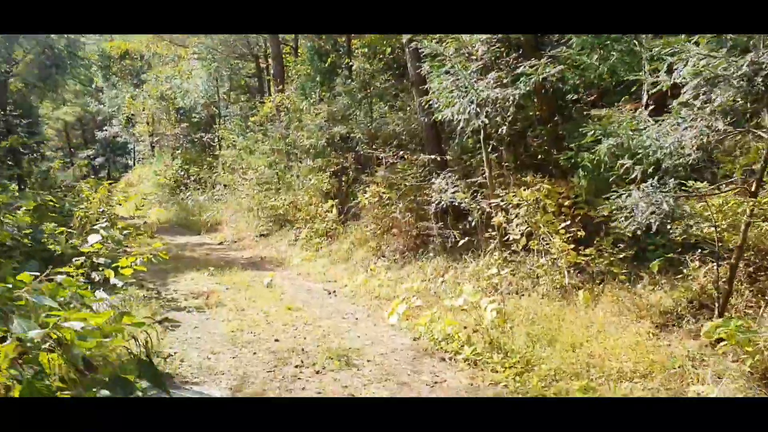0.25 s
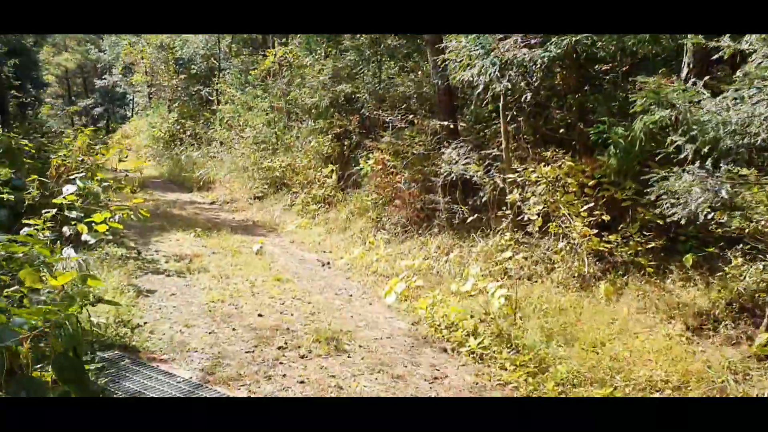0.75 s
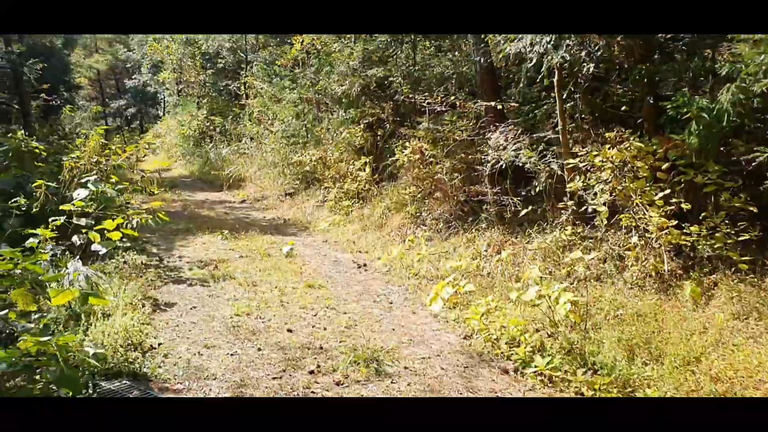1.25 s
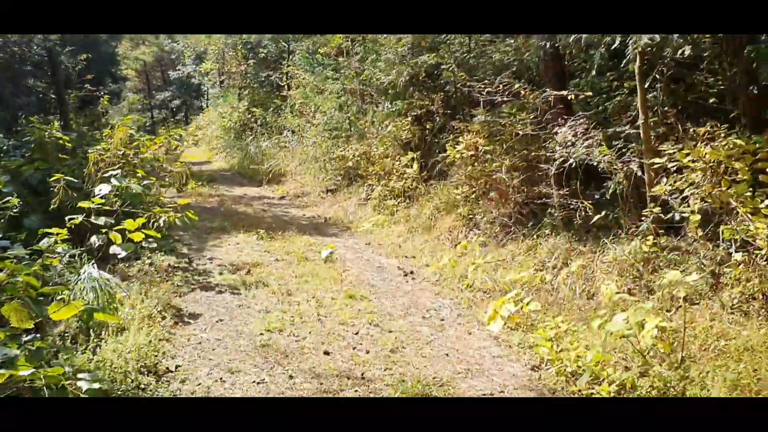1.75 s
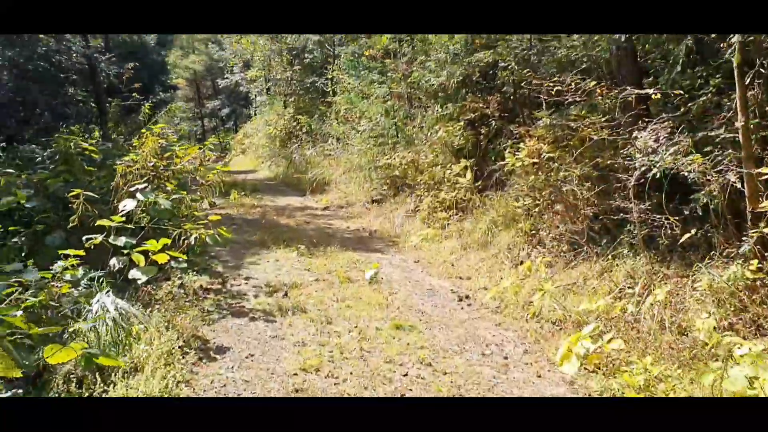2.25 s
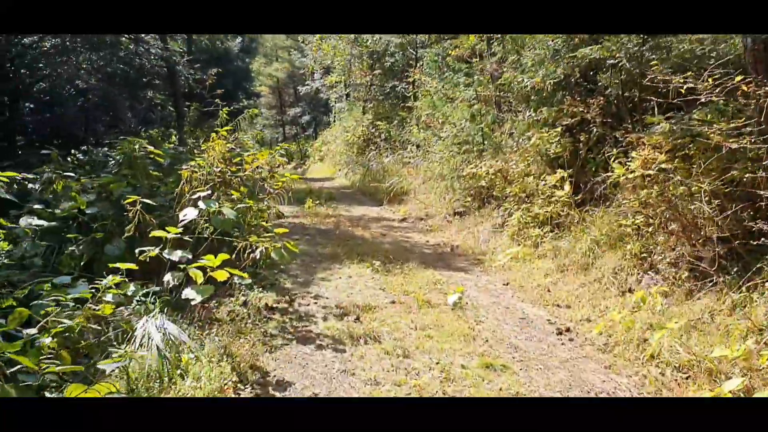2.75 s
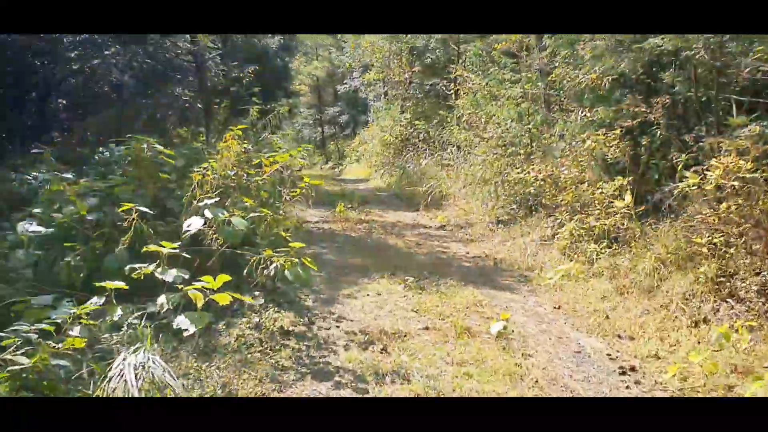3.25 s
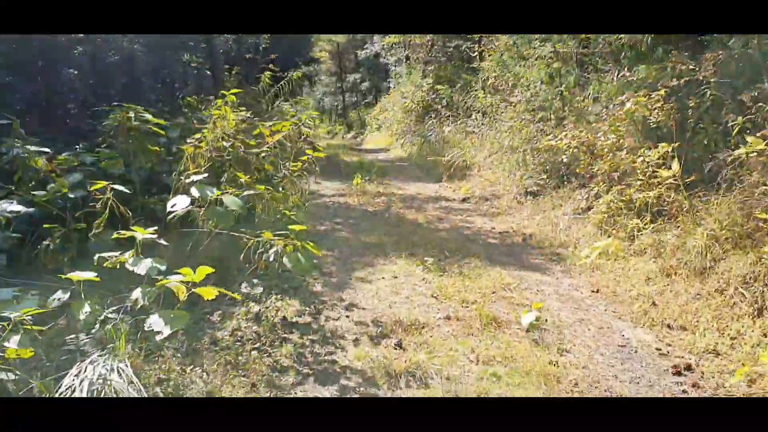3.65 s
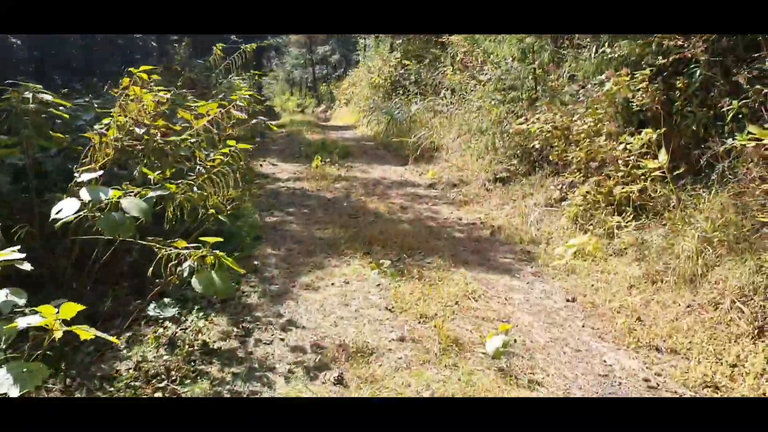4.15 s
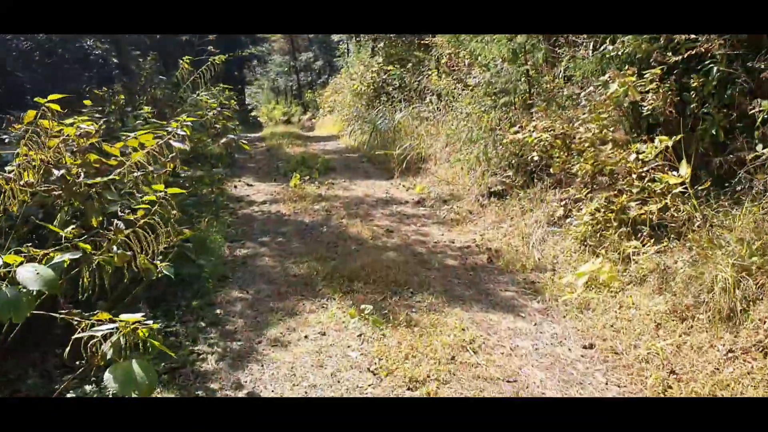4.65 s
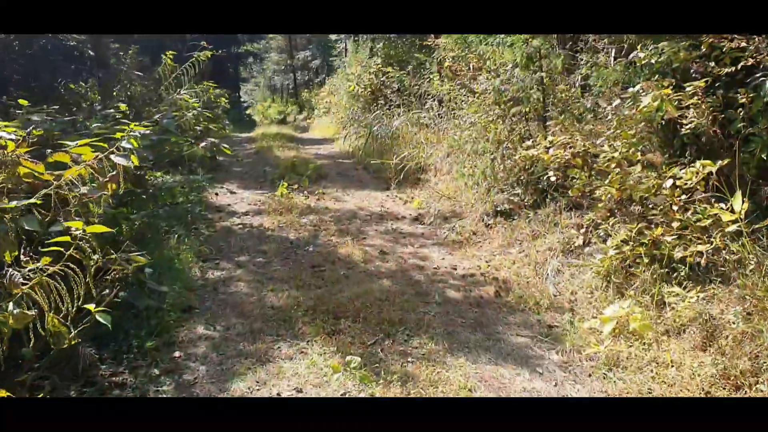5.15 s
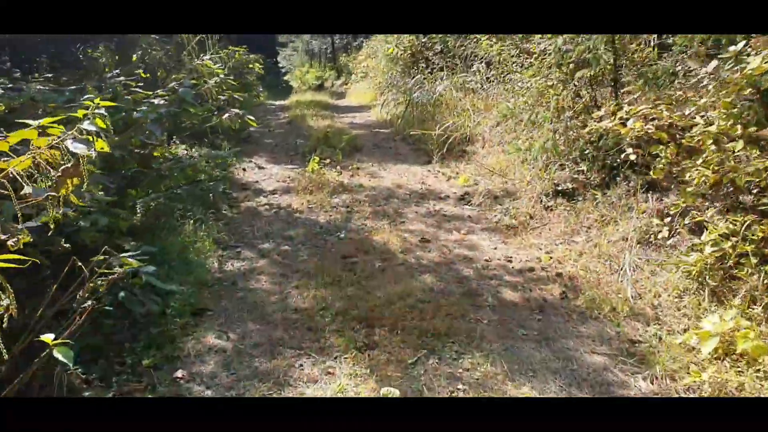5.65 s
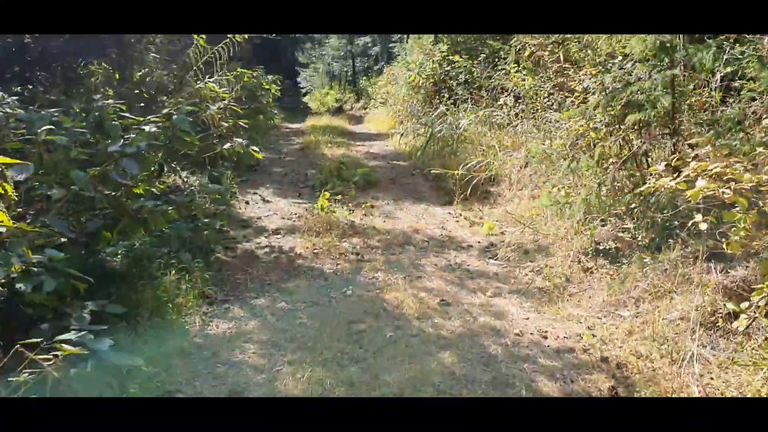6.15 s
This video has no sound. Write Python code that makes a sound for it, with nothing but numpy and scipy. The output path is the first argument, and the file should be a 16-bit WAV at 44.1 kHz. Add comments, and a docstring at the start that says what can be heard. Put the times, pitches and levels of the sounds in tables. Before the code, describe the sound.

A person walks steadily on dry, gritty ground with a hand-held stereo microphone. Crunching steps vary in weight, the third strongest with a knocking stone, and a hard pebble snap stands out midway. Between them come light scuffs, brushing grass, soft cloth rubs and scattered ticks. Deep muffled jolts thump near the beginning and again after the pebble snap. Only a short, thin forest reflection follows.

```python
"""Walk on a gravel trail

A person holding a camera walks a dirt and gravel forest trail, about two steps a second. Heel and sole press
earth, gravel, sand and dry grit: shaped noise and random grains. Single stones, twigs and clods knock, and
heels thump dully: short sine rings with a snap. Cloth, loose ground and grass rustle. The jolts of walking boom
in the camera body as low noise; the forest adds a short, thin tail."""
import sys
import numpy as np
from scipy import signal
from scipy.fft import rfft, irfft, next_fast_len
from scipy.io import wavfile
from scipy.ndimage import uniform_filter1d, map_coordinates

SR = 44100
rng = np.random.default_rng(int(sys.argv[2]) if len(sys.argv) > 2 else 0)


def master_out(mix):
    """Clip the mix to full scale and print it as 16-bit PCM to the path in sys.argv[1]."""
    frames = np.transpose(np.atleast_2d(mix))
    ceiling = np.clip(frames, -1, 1)
    pcm = np.round(ceiling * 32767).astype(np.int16)
    wavfile.write(sys.argv[1], SR, pcm)


N = 282681
TIME_S = np.arange(N) / SR


def amp(db):
    """Amplitude factor of a level in dB."""
    return 10 ** (np.asarray(db) / 20)


def unit(x):
    """x scaled to rms 1."""
    return x / np.sqrt(np.mean(x ** 2) + 1e-20)


def noise():
    """Two unrelated channels of white noise."""
    return rng.standard_normal((2, N))


def along(points, hz):
    """Values at hz, interpolated between (Hz, value) points on a log frequency axis."""
    point_hz, value = np.transpose(points)
    return np.interp(np.log(hz + 1), np.log(point_hz + 1), value)


def curves(rows):
    """One value per sample for each column after the time."""
    s, *columns = np.transpose(rows)
    return [np.interp(TIME_S, s, column) for column in columns]


def wobble(knots_per_s):
    """A smooth random curve."""
    knots = rng.standard_normal(int(N * knots_per_s / SR) + 4)
    return map_coordinates(knots, [np.arange(N) * knots_per_s / SR])


def hump(s, width_s):
    """A bell-shaped swell of height 1 around time s."""
    return np.exp(-np.minimum(((TIME_S - s) / width_s) ** 2, 50))


def filtered(x, response):
    """x times a response of frequency, padded against wrap-around."""
    m = next_fast_len(N + SR // 4)
    spectrum = rfft(x, m) * response(np.fft.rfftfreq(m, 1 / SR))
    return irfft(spectrum, m)[..., :N]


# Stereo width. Each row: frequency in Hz, side minus mid in dB.
SIDE_WIDTH = [(60, -4), (130, -11.5), (300, -12.5), (1000, -10.5), (2200, -5.5), (4400, -2.5), (7000, 0),
              (9000, 1), (15000, 0.5)]


def stereo(pair, spectrum):
    """Two unrelated signals become coloured mid and side, then left and right of joint rms 1."""
    def response(hz):
        side_gain = amp(along(SIDE_WIDTH, hz))
        return amp(along(spectrum, hz)) * np.array([np.ones_like(hz), side_gain])

    mid, side = filtered(pair, response)
    return unit(np.array([mid + side, mid - side]))


def grains(rate_hz, spread_db, octaves=6):
    """Random tiny impacts of uneven size, rate_hz in each octave from 17 kHz down; each rings in its octave."""
    out = np.zeros((2, N))
    for octave in range(octaves):
        top_hz = 17000 / 2 ** octave
        size_db = spread_db * np.minimum(rng.standard_normal(N), 1.6)
        hits = (rng.random(N) < rate_hz / SR) * amp(size_db)
        signed_hits = unit(hits * rng.choice([-1, 1], (2, N)))
        b, a = signal.butter(1, [top_hz / 2, top_hz], "bandpass", fs=SR)
        out += signal.lfilter(b, a, signed_hits)
    return unit(out)


# Rustle of walking. Each row: time in seconds, cloth in dB, loose ground in dB, grass in dB.
RUSTLE_LEVELS = [(0.0, -66, -70.5, -67.5), (0.5, -77.5, -79.5, -76), (0.89, -70, -68, -73),
                 (1.18, -65.5, -61.5, -66.5), (1.37, -67.5, -72.5, -77), (2.05, -75, -79.5, -78.5),
                 (2.27, -64, -70, -65), (2.82, -69, -72.5, -75.5), (3.18, -75, -80.5, -79),
                 (3.46, -66, -68, -74), (4.34, -72, -69.5, -69), (4.53, -68, -74.5, -71),
                 (4.86, -71, -62.5, -66.5), (5.0, -63.5, -73, -73), (5.21, -76.5, -75.5, -76.5),
                 (5.91, -67.5, -61.5, -66.5), (6.12, -68, -72.5, -74.5), (6.41, -77, -69.5, -70)]
# Swinging foot skims the ground. Each row: peak in seconds, half width in seconds,
# loose ground in dB, grass in dB.
FOOT_SKIMS = [(0.88, 0.045, -62.5, -69.5), (1.06, 0.062, -62, -59), (2.11, 0.05, -72.5, -64),
              (2.38, 0.046, -62.5, -60), (3.025, .022, -68.5, -86), (3.66, .06, -69.5, -64.5),
              (4.19, 0.065, -62.5, -60), (4.65, 0.035, -65, -67), (5.81, 0.028, -58.5, -63)]
# Spectra of rubbing cloth, loose ground and dry grass. Each row: frequency in Hz, gain in dB.
CLOTH_SPECTRUM = [(50, -23), (130, -6.5), (200, 2), (320, 0.5), (480, -4.5), (800, -18), (2500, -50)]
GROUND_SPECTRUM = [(200, -21), (500, -2), (900, -0.5), (1500, 0.5), (2200, -4.5), (3200, -15), (5000, -25),
                   (9000, -52)]
GRASS_SPECTRUM = [(800, -31.5), (2400, -4), (4500, -2.5), (7000, -7.5), (8400, -7.5), (9400, -0.5),
                  (11200, 0.5), (15500, -6.5)]
SWING_LEAD_S, SWING_WIDTH_S = 0.1, 0.06  # the free leg passes this long before its heel lands
SWING_GROUND_DB, SWING_GRASS_DB = 1.5, 2.5  # swell as it passes


def rustle():
    """Cloth rubs, loose crumbs tick, dry grass brushes; ground and grass swell as a leg swings or a foot skims."""
    cloth_db, ground_db, grass_db = curves(RUSTLE_LEVELS)
    swing = sum(hump(step[0] - SWING_LEAD_S, SWING_WIDTH_S) for step in FOOTFALLS)
    ground_skim, grass_skim = sum(
        amp(levels_db)[:, None] * hump(s, width_s) for s, width_s, *levels_db in FOOT_SKIMS)

    cloth_level = amp(cloth_db + 1.5 + 2.7 * wobble(40))
    cloth = cloth_level * stereo(noise(), CLOTH_SPECTRUM)

    crumbs = stereo(grains(rate_hz=28, spread_db=6.5) + 1.28 * noise(), GROUND_SPECTRUM)
    ground_level = np.hypot(amp(ground_db - 0.4 + SWING_GROUND_DB * swing), ground_skim)
    ground = ground_level * amp(1.4 * wobble(40)) * crumbs

    stalks = stereo(grains(rate_hz=60, spread_db=4.5, octaves=3) + 2.14 * noise(), GRASS_SPECTRUM)
    grass_level = np.hypot(amp(grass_db + 4.5 + SWING_GRASS_DB * swing), grass_skim)
    grass = grass_level * amp(1.1 * wobble(45)) * stalks
    return cloth + ground + grass * amp([[0.8], [-0.8]])


# Steady rumble of the hand's tremor. Each row: time in seconds, level in dB.
TREMOR_LEVELS = [(0, -69), (0.6, -65), (2.0, -63), (3.0, -62.5), (4.3, -62.5), (5.3, -72), (5.9, -67),
                 (6.41, -65.5)]
# Jolts that shake the camera. Each row: peak in seconds, half width in seconds, level in dB.
JOLTS = [(0.12, 0.06, -52.5), (0.21, 0.045, -45), (0.69, 0.049, -53), (1.0, 0.022, -61),
         (1.21, 0.02, -52.5), (1.495, 0.029, -52), (3.39, 0.037, -44.5), (3.87, 0.063, -46.5),
         (4.05, 0.027, -51), (4.15, .04, -52.5), (4.835, 0.016, -46), (5.585, 0.029, -55.5)]
# Boom of the camera body. Each row: frequency in Hz, gain in dB.
BODY_SPECTRUM = [(15, -35), (30, -15), (45, -1), (59, 1.5), (78, -6), (120, -15), (200, -29.5), (600, -80)]


def handling():
    """The hand's tremor and the jolts of walking shake the camera body, which booms low."""
    tremor_db, = curves(TREMOR_LEVELS)
    tremor_power = amp(tremor_db + 3.3 * wobble(16)) ** 2
    jolt_power = sum((amp(db) * hump(s, width_s)) ** 2 for s, width_s, db in JOLTS)
    shake = np.sqrt(tremor_power + jolt_power)
    boom = stereo(noise(), BODY_SPECTRUM)
    # divide out the noise's own swell, so that shake alone sets the level
    swell = np.sqrt(np.abs(uniform_filter1d(np.mean(boom ** 2, axis=0), size=3000)) + 1e-6)
    return amp(1.5) * shake * boom / swell * amp([[-1.1], [1.1]])


def press(age_s, rise_s, fade_s):
    """Load on the ground: it builds over rise_s, then falls by 20 dB in each fade_s."""
    build = np.clip(age_s / rise_s, 0, 1) ** 1.43
    return build * amp(-20 * np.maximum(age_s - rise_s, 0) / fade_s)


# Steps. Each row: heel strike in seconds, heel rise in seconds, roll from heel to sole in seconds,
# sole's 20 dB fade in seconds, sole over heel in dB, extra sand and grit as the sole scuffs in dB,
# earth in dB, gravel in dB, sand in dB, grit in dB.
FOOTFALLS = [ (0.082, .024, 0.039, 0.1, 0, 6.5, -53, -45.5, -58.5, -51.5),
             (0.629, 0.023, 0.057, 0.11, -3.5, 8, -45.5, -41.5, -54, -54),
             (1.150, 0.033, 0.034, 0.0926, -5.5, -5.5, -42, -40.5, -48.5, -44.5),
             (1.638, 0.037, 0.061, 0.0859, -1, -6, -51, -45.5, -56, -55.5),
             (2.148, 0.024, 0.098, 0.0368, 1.5, -2.5, -49, -44.5, -48.5, -48.5),
             (2.698, 0.027, 0.064, 0.06, 8, 0, -56, -51.5, -57, -56.5),
             (3.248, 0.037, 0.046, 0.09, 1.5, 4, -48.5, -47, -56, -56.5),
             (3.740, 0.029, 0.042, .17, -6.5, 0.5, -49, -41, -48, -47),
             (4.282, 0.037, 0.059, .08, -11, 4, -52, -41.5, -53, -52.5),
             (4.798, 0.031, .076, 0.1046, 2.5, -7.5, -54.5, -48, -54, -50),
             (5.366, 0.026, .048, .095, -11, 1.5, -57, -43.5, -50, -56.5),
             (5.883, 0.055, 0.067, 0.01, 0.5, 8.5, -59, -49, -46.5, -48),
             (6.34, 0.023, .048, 7, 9, -1, -76, -51.5, -51, -56)]
# Spectra of the ground underfoot. Each row: frequency in Hz, gain in dB.
EARTH_SPECTRUM = [(40, -20), (110, -8), (190, -3.5), (270, 0), (450, -2.5), (700, -9), (1500, -41),
                  (4000, -90)]
GRAVEL_SPECTRUM = [(150, -35.5), (450, -5), (750, -4), (1000, 0.5), (1500, -.5), (2100, -4.5),
                   (2800, -12.5), (4500, -27.5), (9000, -55.5)]
SAND_SPECTRUM = [(800, -30), (2200, -5), (3600, -0.5), (5300, -3.5), (7000, -10), (9000, -16.5),
                 (15000, -36.5)]
GRIT_SPECTRUM = [(2000, -37), (5000, -10.5), (7000, -9), (8400, -5.5), (9400, 1.5), (11500, 1.5),
                 (15500, -4.5)]
SOLE_RISE_S, HEEL_FADE_ROLLS = 0.018, 1.5  # the heel fades by 20 dB in this many roll times


def footsteps():
    """Heel, then sole, load the ground and let it settle: dull earth, crunching gravel, scraping sand, dry grit."""
    age_s = np.arange(SR) / SR
    power = np.zeros((4, N))
    for s, rise_s, roll_s, fade_s, sole_db, scuff_db, *levels_db in FOOTFALLS:
        heel = press(age_s, rise_s, HEEL_FADE_ROLLS * roll_s)
        sole_gain = amp(sole_db + scuff_db * np.array([[0], [0], [1], [1]]))
        sole = sole_gain * press(age_s - roll_s, SOLE_RISE_S, fade_s)
        load = amp(levels_db)[:, None] ** 2 * (heel ** 2 + sole ** 2)
        span = power[:, round(s * SR):][:, :SR]
        span += load[:, :span.shape[1]]
    earth, gravel, sand, grit = np.sqrt(power)

    slips = unit(amp(1.9 * wobble(120)))  # the ground gives way in small jerks
    thud = earth * slips * stereo(noise(), EARTH_SPECTRUM)
    crunch = gravel * slips * amp(-0.5) * stereo(grains(rate_hz=300, spread_db=4.5), GRAVEL_SPECTRUM)
    scrape = sand * stereo(grains(rate_hz=650, spread_db=4, octaves=4), SAND_SPECTRUM)
    flicker = amp(2.0 + 3.2 * wobble(90))
    fizz = grit * flicker * stereo(grains(rate_hz=2200, spread_db=4.0, octaves=3), GRIT_SPECTRUM)
    return thud + crunch + scrape * amp([[-0.6], [0.6]]) + fizz * amp([[1.1], [-1.1]])


STRAY_AFTER_S, STRAY_WITHIN_S = 0.037, 0.09
STRAY_DB, STRAY_HZ = -42, 1060  # centres: 4 dB and one octave either way


def strays(count):
    """Each step dislodges count small stones at random, as rows like those of LOUD_KNOCKS."""
    heels_s = np.repeat([step[0] for step in FOOTFALLS], count)
    rows = []
    for heel_s, (late, size, pitch) in zip(heels_s, rng.random((len(heels_s), 3))):
        s = heel_s + STRAY_AFTER_S + STRAY_WITHIN_S * late
        rows.append((s, STRAY_DB + 8 * (size - 0.5), STRAY_HZ * 2 ** (2 * pitch - 1), 0.8))
    return rows


# Loudest stones, twigs and clods, and a few dull heel thumps. Each row: time in seconds, relative peak level in
# dB, pitch in Hz, # sharp snap against the ring as a ratio.
LOUD_KNOCKS = [ (0.1860, -37, 1820, 0.6), (0.6590, -25.5, 820, 0.65), (0.7126, -36.5, 483, 0),
               (0.7825, -33, 3320, 1.4), (0.8315, -37, 3250, 1.2), (0.8396, -41.5, 3300, 1.2),
               (1.0120, -35, 11500, 0.66), (1.0450, -41, 550, 0.4), (1.0998, -38.5, 1600, .4),
               (1.201, -30.5, 333, 0.1), (1.206, -16, 1233, 0), (1.5670, -48.5, 8000, 0.9),
               (1.6810, -31.5, 1640, 0.1), (1.7138, -31.5, 930, 0.6), (1.7232, -31.5, 1590, 0.1),
               (2.045, -44.5, 9900, 0.6), (2.2297, -31.5, 1340, 0.6), (2.2618, -31.5, 570, 0.9),
               (2.2800, -33.5, 1720, 0.6), (2.345, -38.5, 3000, 1.4), (2.3833, -37, 4000, 1.4),
               (2.711, -40.5, 2820, 1), (2.7916, -31, 1000, 0.5), (3.0240, -47.5, 1000, 0),
               (3.2953, -25.5, 1750, 0.1), (3.2976, -21, 1620, 0.4), (3.3161, -11, 1760, 1.2),
               (3.3170, -34.5, 10000, 1), (3.3184, -12.5, 1820, 1), (3.322, -25.5, 1520, 0.7),
               (3.6169, -42, 5700, 1.1), (3.6797, -42.5, 5500, 1.2), (3.7490, -36, 960, 0.5),
               (3.7677, -23.5, 4800, 1), (3.7686, -29.5, 10500, 1), (3.7705, -26.5, 2220, 1),
               (3.8835, -36, 11500, 0.4), (3.8880, -30.5, 1470, 0.6), (4.3222, -23.5, 1680, 0.6),
               (4.3273, -27.5, 2000, 0.3), (4.6496, -37.5, 1780, 1.3), (4.8907, -37, 1250, .5),
               (4.9040, -37, 880, 0.9), (4.9254, -34.5, 1157, 1), (5.3839, -31, 1550, .7),
               (5.4338, -36, 1160, 0.4), (5.5150, -44.5, 3400, 1), (5.7613, -39, 3780, 1),
               (5.8004, -39.5, 1690, 0.3), (6.2068, -46, 1310, 0.5), (6.3665, -34.5, 1570, 0.8)]
RING_S, RING_REF_HZ, RING_REF_DB = 0.0067, 1000, -31  # t60 of a knock of this pitch and level
RING_PITCH_POWER, RING_DB_SHARE = 0.39, 0.11  # lower and louder knocks ring longer
HALF_LAG_S, LAG_SCATTER_S = 3e-5, 1e-5  # one channel this much early, the other this much late


def knocks():
    """A stone, twig or clod rings briefly, or a heel thumps dully; the sharper ones add a snap and a puff of
    grit."""
    out = np.zeros((2, N + SR))
    t = np.arange(SR // 20) / SR
    for s, db, hz, sharpness in LOUD_KNOCKS + strays(count=2):
        pitch_stretch = (RING_REF_HZ / hz) ** RING_PITCH_POWER
        t60_s = RING_S * pitch_stretch * amp(RING_DB_SHARE * (db - RING_REF_DB))
        # the feet alternate, and so does the channel that leads
        foot = 1 if sum(step[0] < s for step in FOOTFALLS) % 2 else -1
        lag_s = foot * HALF_LAG_S + LAG_SCATTER_S * rng.uniform(-1, 1)
        age_s = np.maximum(t + np.array([[-lag_s], [lag_s]]) - abs(lag_s), 0)

        onset = 1 - np.exp(-age_s * hz / 0.6)
        ring = np.sin(2 * np.pi * hz * age_s) * amp(-60 * age_s / t60_s) * onset
        band = signal.butter(7, [hz / 4.2, min(hz + 1650, SR / 3)], "bandpass", fs=SR, output="sos")
        snap = signal.sosfilt(band, 1.0 * (t == 0))
        puff = 0.047 * rng.standard_normal((2, len(t))) * amp(-60 * t / 0.012)
        hit = ring / np.abs(ring).max() + sharpness * (1.08 * snap / np.abs(snap).max() + puff)
        out[:, round(s * SR):][:, :len(t)] += amp(db + 1) * hit / np.abs(hit).max()
    return out[:, :N]


# Decay of the forest's tail. Each row: frequency in Hz, t60 in seconds.
FOREST_DECAY = [(200, .12), (1700, .2), (10000, .1)]


def forest(x):
    """Trunks and bushes scatter back a short, thin tail: convolution with decaying stereo noise."""
    hz, t, cells = signal.stft(rng.standard_normal((2, SR // 3)), SR, nperseg=256)
    decay = amp(-60 * t / along(FOREST_DECAY, hz)[:, None])
    tail = signal.istft(cells * decay, SR, nperseg=256)[1]
    return signal.fftconvolve(x, tail / np.linalg.norm(tail[0]), axes=1)[:, :N]


def scene():
    """Feet and their forest tail, over rustle and handling rumble."""
    feet = footsteps() + knocks()
    return feet + amp(-16.5) * forest(feet) + rustle() + handling()


TOP_HZ = 15800


def record(dry):
    """The camera keeps nothing above its band limit."""
    return filtered(dry, lambda hz: hz < TOP_HZ)


dry = scene()
out = record(dry)
master_out(out)
```